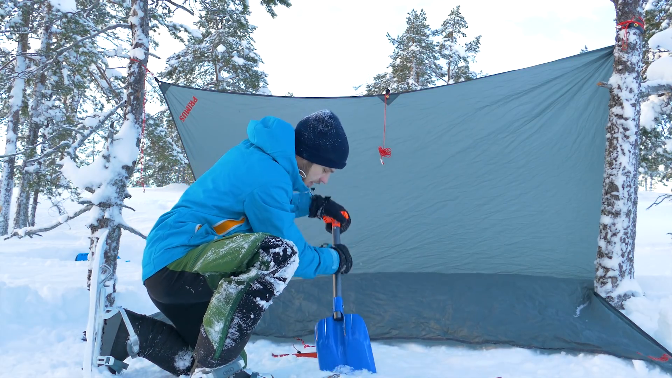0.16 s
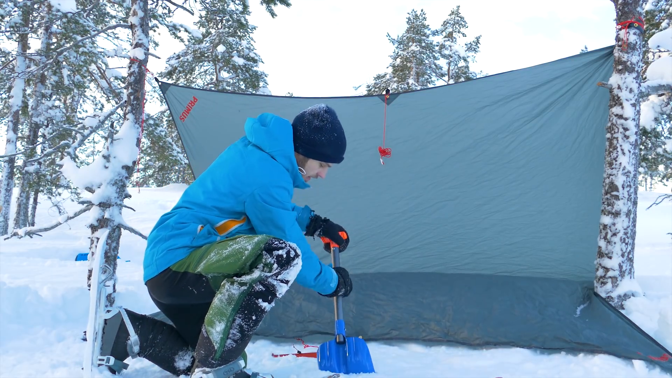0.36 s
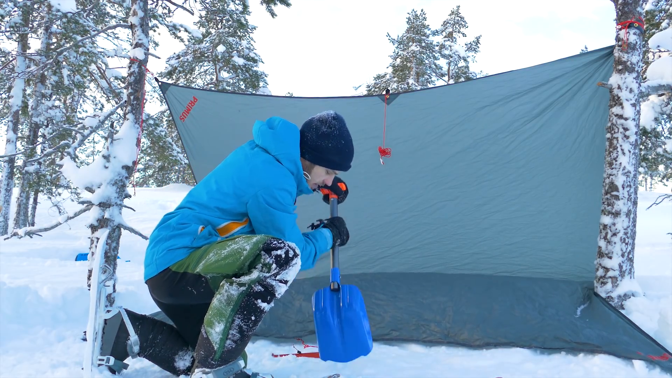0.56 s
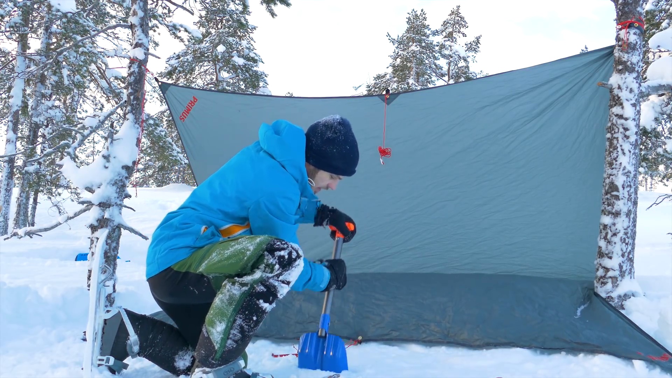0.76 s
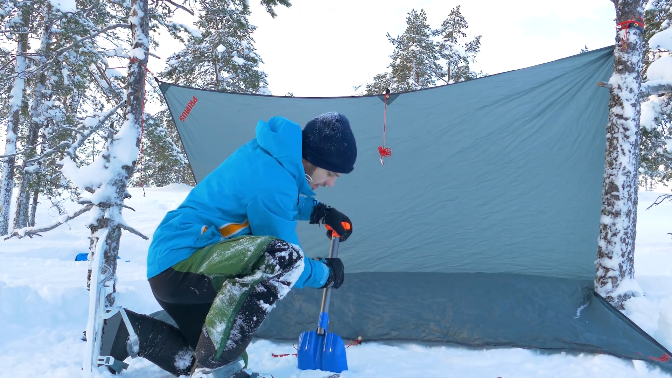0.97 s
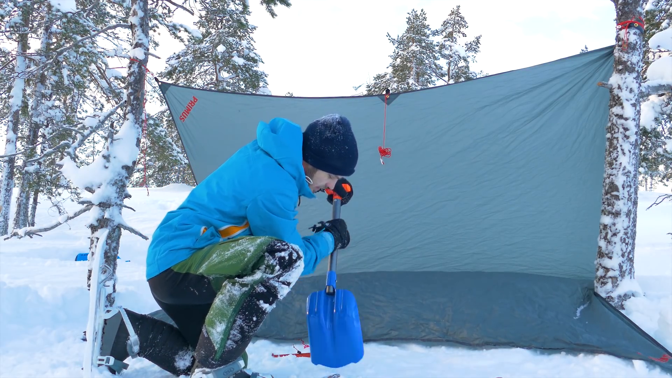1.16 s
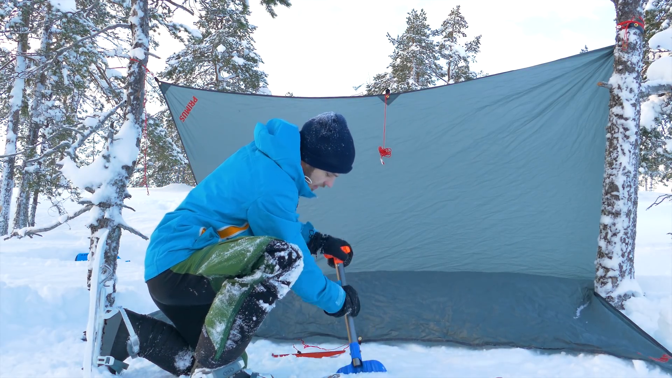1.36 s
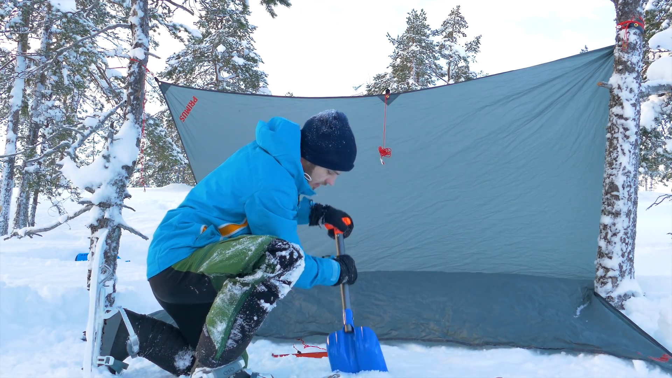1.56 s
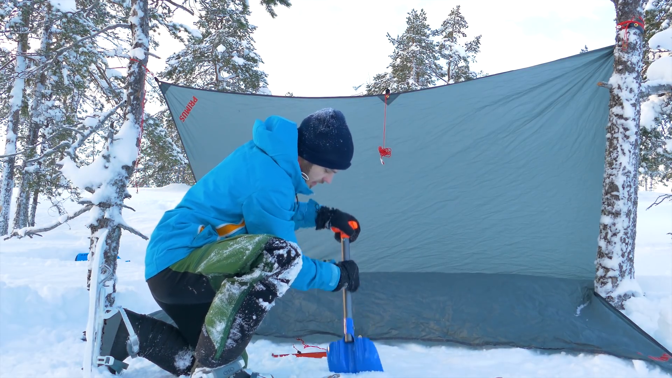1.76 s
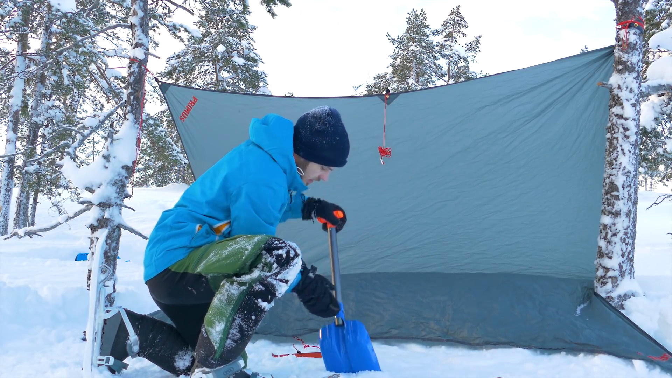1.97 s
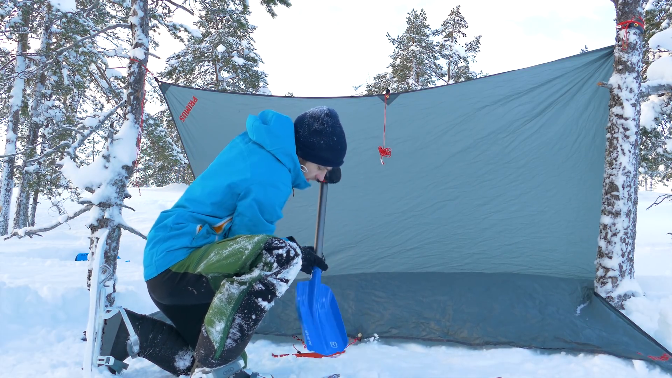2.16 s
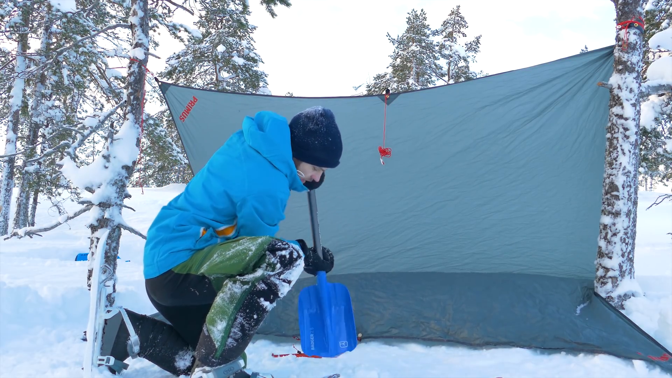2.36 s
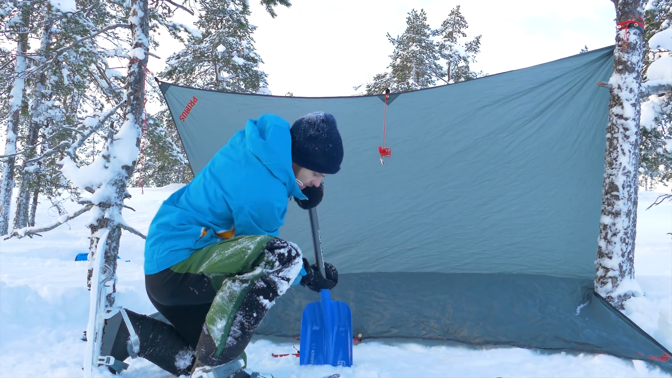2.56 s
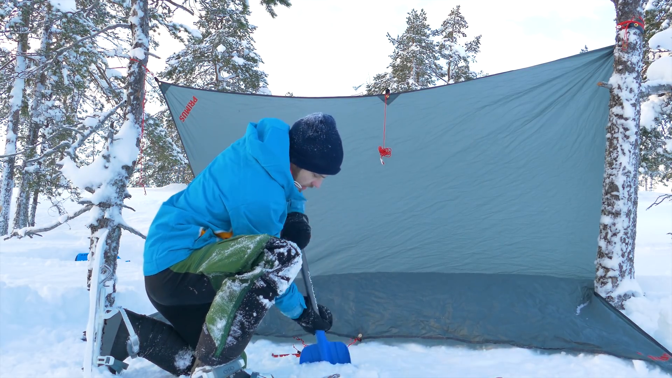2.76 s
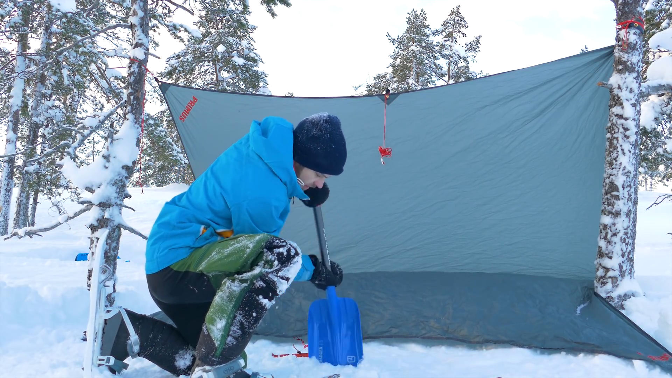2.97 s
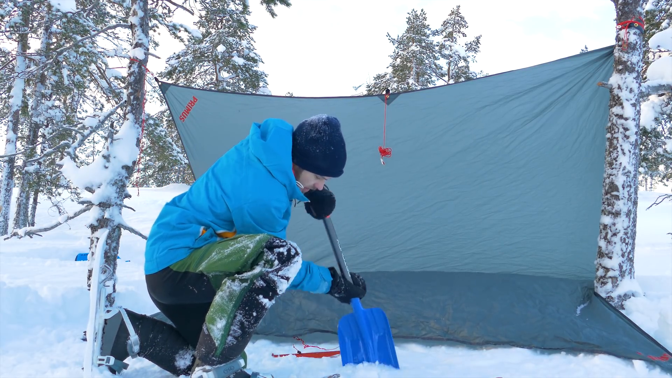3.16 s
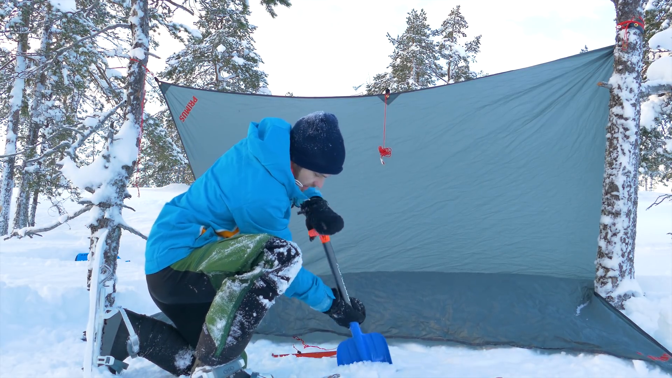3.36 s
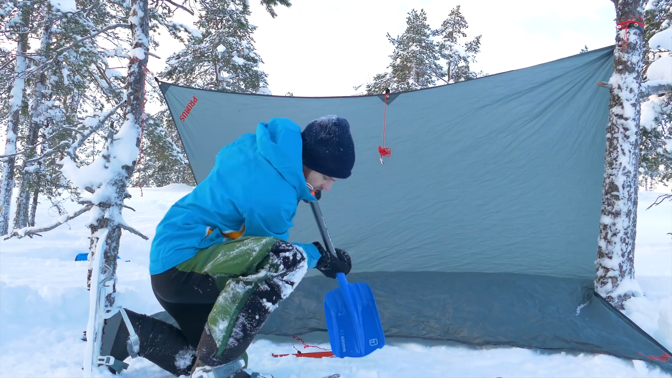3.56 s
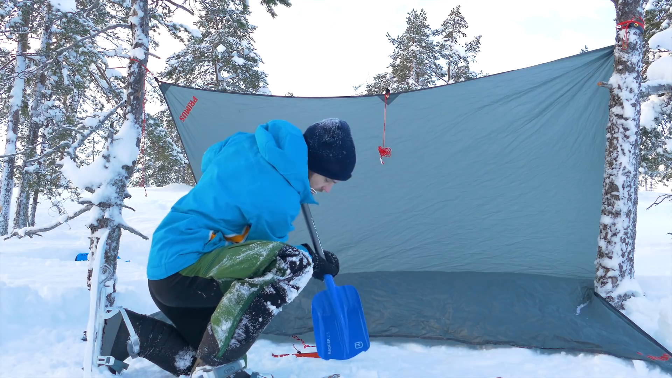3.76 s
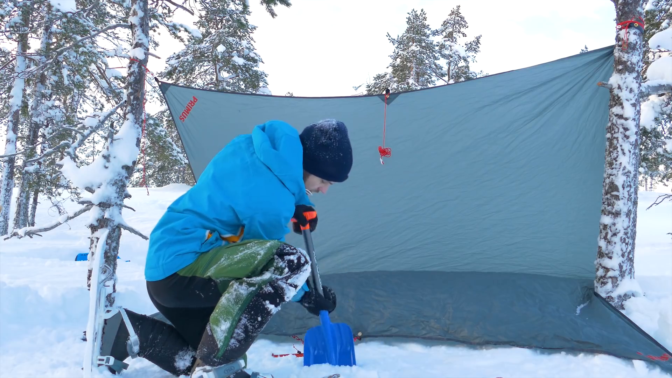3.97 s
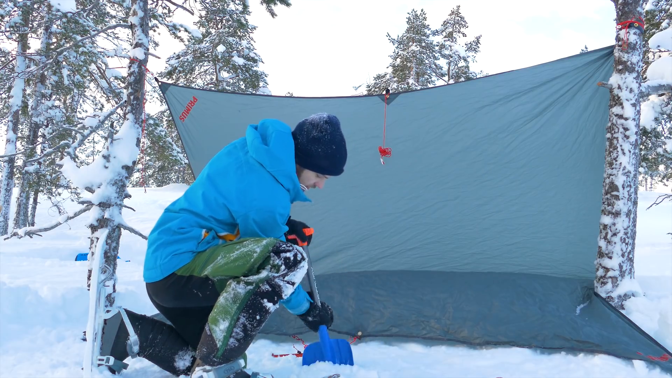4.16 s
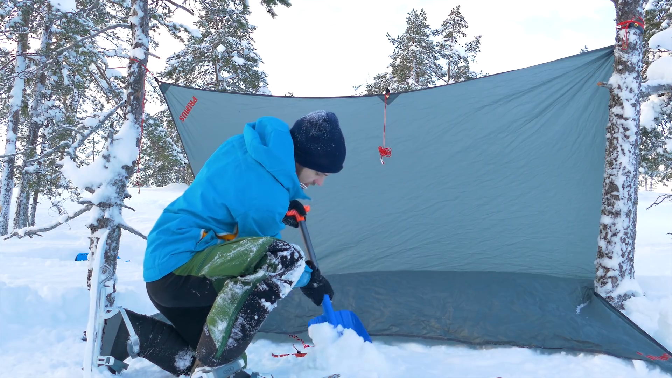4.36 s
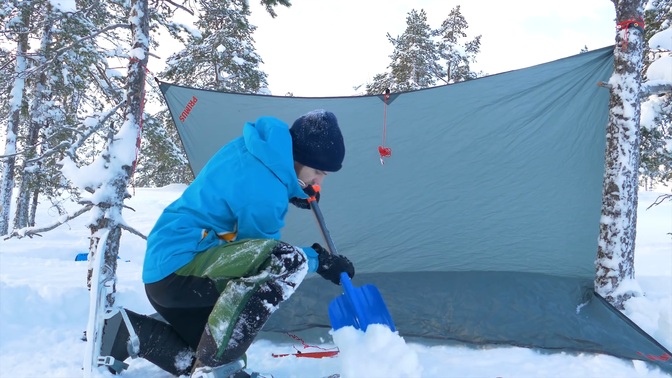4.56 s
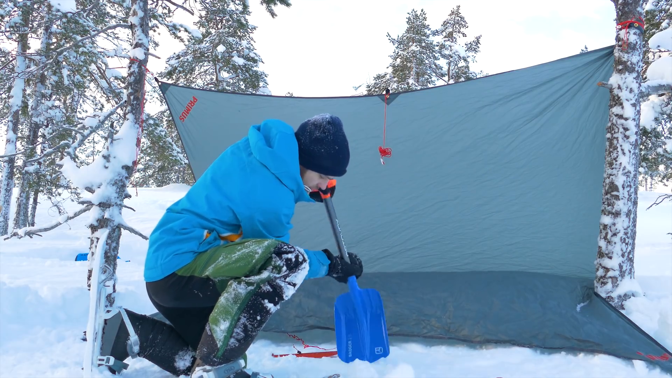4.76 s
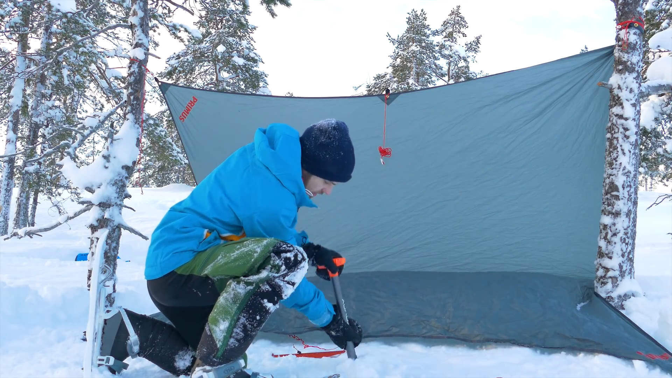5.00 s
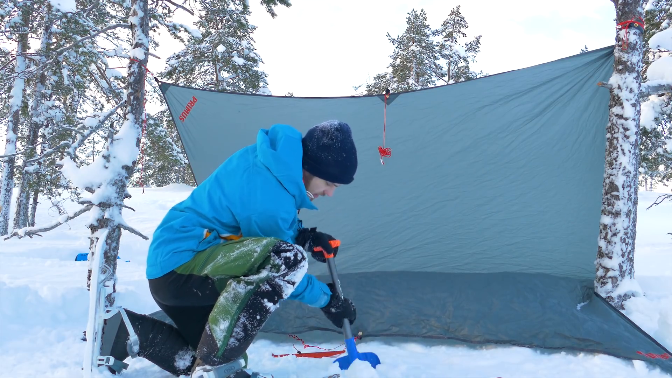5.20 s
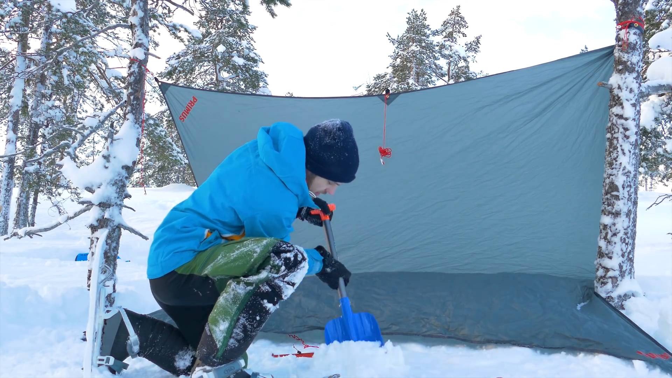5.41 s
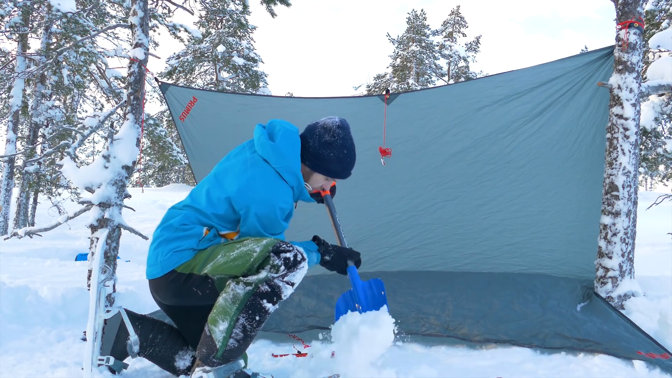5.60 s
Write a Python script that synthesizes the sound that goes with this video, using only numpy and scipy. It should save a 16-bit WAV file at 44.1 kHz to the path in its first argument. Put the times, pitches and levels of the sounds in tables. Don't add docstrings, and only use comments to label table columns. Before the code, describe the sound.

Close, crisp snow crunches, short scrapes and dull blade knocks from a hand shovel, with a distant low hum and soft outdoor hiss.

```python
import sys
import numpy as np
from scipy import signal
from scipy.fft import rfft, irfft, next_fast_len
from scipy.io import wavfile
from scipy.ndimage import uniform_filter1d

SR = 44100
rng = np.random.default_rng(int(sys.argv[2]) if len(sys.argv) > 2 else 0)


def natural_amplitude(level_db):
    exponent = np.asarray(level_db, float) / 20
    return 10 ** exponent


def pcm_store(signal):
    levels = np.round(np.clip(np.atleast_2d(signal), -1, 1) * 32767)
    wavfile.write(sys.argv[1], SR, levels.astype(np.int16).T)


N = 248724


def evened(x):
    return x / np.sqrt(np.mean(x ** 2) + 1e-20)


def read(points, hz):
    f, value = np.transpose(points)
    return np.interp(np.log(hz + 1), np.log(f + 1), value)


def add(mix, s, sound):
    part = mix[round(s * SR):][:len(sound)]
    part += sound[:len(part)]


def coloured(x, gain):
    size = next_fast_len(len(x))
    return irfft(rfft(x, size) * gain(np.fft.rfftfreq(size, 1 / SR)), size)[:len(x)]


def resonate(x, hz, width):
    r = np.exp(-np.pi * width / SR)
    return 2 * signal.lfilter([1 - r], [1, -r * np.exp(2j * np.pi * hz / SR)], x + 1e-18).real


def flicker(ms):
    size = max(int(ms * SR / 1000), 2)
    return evened(uniform_filter1d(uniform_filter1d(rng.standard_normal(N), size), size))


def drone(waver=0.0309, fuzz_db=-4, octave_db=-20, throb_db=4.0):
    # (time [s], pitch [Hz], level [dB])
    engine = [(0.0, 90.3, -51), (0.47, 105.8, -45.5), (0.69, 108.1, -42), (1.0, 96.84, -45),
              (1.26, 99.34, -44.5), (1.71, 88.85, -42.5), (1.92, 79.44, -55), (2.14, 92.56, -43),
              (2.48, 85.4, -47), (2.8, 90.3, -42), (3.82, 88.26, -48.5), (3.88, 85.17, -47.5),
              (3.99, 97.3, -45.5), (4.229, 100, -44), (4.399, 113.5, -44.5), (4.55, 114.4, -41),
              (5.499, 118.8, -44.5), (5.64, 112.4, -42.5)]
    s, hz, db = np.transpose(engine)
    t = np.arange(N) / SR
    pitch = np.interp(t, s, hz) * (1 + waver * flicker(ms=33.0))
    turns = 2 * np.pi * np.cumsum(pitch) / SR
    note = np.sqrt(2) * np.cos(turns) * natural_amplitude(throb_db * flicker(ms=15.2))
    fuzz = flicker(ms=7.6) * np.cos(turns) + flicker(ms=17.4) * np.sin(turns)
    octave = flicker(ms=5.7) * np.cos(2 * turns) + flicker(ms=13) * np.sin(2 * turns)
    return natural_amplitude(np.interp(t, s, db)) * (note + natural_amplitude(fuzz_db) * fuzz + natural_amplitude(octave_db) * octave)


def air(level_db=-45.5, swell_db=.5):
    # (pitch [Hz], level [dB per Hz])
    rumble = [(12, -11), (20, -2), (98, 6.5), (113, -2.5), (146, -3.5), (337, -24.5), (897, -36.5),
              (1330, -67), (3160, -59), (4300, -50), (5530, -55), (14300, -70), (16000, -57)]
    noise = coloured(rng.standard_normal(N), lambda hz: natural_amplitude(read(rumble, hz)))
    return natural_amplitude(level_db + swell_db * flicker(ms=420)) * evened(noise)


def motion():
    # (start [s], push [s], hold [s], fade [s], crush [dB])
    stabs = [(0.189, 0.021, 0.046, 0.13, -42), (0.761, 0.00082, 0.019, 0.15, -42.5),
             (0.907, 0.022, 0.091, .03, -72.5), (0.993, 0.021, 0.13, 0.03, -58),
             (1.298, 0.0035, .008, 0.016, -58), (1.302, 0.04, 0.012, 0.081, -38.5),
             (1.376, .02, 0.034, 0.046, -55.5), (1.747, 0.024, 0.13, 0.11, -55),
             (2.586, 0.056, 0.011, .035, -39), (2.852, 0.043, 0.12, 0.037, -54),
             (3.11, 0.047, .03, 0.023, -65), (3.152, 0.063, 0.016, 0.1, -43),
             (3.873, 0.066, 0.042, 0.077, -40.5), (4.838, 0.004, 0.025, 0.032, -51),
             (4.839, 0.057, 0.0083, 0.033, -36)]
    # (start [s], push [s], hold [s], fade [s], crush [dB])
    drags = [(0.0, 0.0015, 0.15, 0.041, -63.5), (.12, 0.041, .012, 0.018, -60),
             (0.38, 0.052, 0.11, 0.062, -59), (1.03, 0.071, 0.0022, 0.012, -46),
             (1.524, 0.11, .005, 0.16, -52), (1.768, 0.052, 0.0036, 0.097, -43),
             (1.898, 0.15, 0.044, 0.039, -53), (2.106, .02, 0.12, 0.036, -67.5),
             (2.259, 0.036, 0.079, 0.17, -59.5), (2.648, 0.037, 0.0092, 0.03, -34.5),
             (2.678, 0.037, 0.063, 0.071, -45.5), (2.922, 0.068, 0.0044, 0.11, -47.5),
             (3.228, 0.053, 0.0099, 0.09, -40.5), (3.344, 0.073, .2, 0.029, -56.5),
             (3.957, 0.042, 0.007, 0.05, -36), (4.017, 0.029, 0.05, 0.077, -49.5),
             (4.148, 0.12, 0.1, 0.055, -57), (4.305, 0.06, 0.018, 0.11, -47.5),
             (4.45, 0.06, 0.077, 0.07, -69), (4.616, 0.11, .01, 0.16, -64),
             (4.887, 0.054, 0.034, 0.091, -41), (4.966, 0.045, 0.052, 0.066, -48),
             (5.121, 0.14, 0.11, .08, -61.5), (5.36, 0.089, 0.069, 0.076, -56),
             (5.551, 0.072, 0.024, 0.13, -56)]
    # (at start [dB], at end [dB])
    powder_fizz = [
        (-0.88, -3.5),
        (-1.8, -1.5),
    ]
    # (time [s], flat-on body [dB], powder [dB], freedom to ring [dB])
    lie = [(.1, 0.5, -13.5, 0.5), (.25, 5.5, 0, 0.5), (.5, 2.5, 0, -1.5), (.78, 4.5, 2, -0.5),
           (1.1, 0, 0.5, 0), (1.35, 4, 2, -2), (1.63, 0, -0.5, -.6), (1.83, 1.5, 0.5, 1.5),
           (2.07, 5, 0.5, 1), (2.349, 2.5, -4.5, 0.5), (2.67, 1, -1, 0), (3.0, -1, -0.5, -2),
           (3.26, -0.5, -1.5, 0.5), (3.55, 1, -3, 0.5), (3.97, 0, -3, -0.5), (4.35, -3, 1.5, -1.5),
           (4.9, -0.5, -0.5, 0.5), (5.3, 0.5, 0, 1)]
    bite_db, swell_db, spent_db = -18, -22, -38.5
    rest_db, still_fizz_db = -75, -77.5
    thin_per_db, even_db = 0.4, -61

    t = np.arange(N) / SR
    crush, fizz = np.full(N, natural_amplitude(2 * rest_db)), np.full(N, natural_amplitude(2 * still_fizz_db))
    for first_db, rows, (start_db, end_db) in zip((bite_db, swell_db), (stabs, drags), powder_fizz):
        for s, push, hold, fade, db in rows:
            at = np.cumsum([0, push, hold, fade])
            u = np.arange(0, at[-1], 1 / SR)
            corners_db = db + np.array([first_db, 0, 0, spent_db])
            power = np.interp(u, at, np.sqrt(natural_amplitude(corners_db))) ** 4
            add(crush, s, power)
            add(fizz, s, power * natural_amplitude(2 * (start_db + (end_db - start_db) * u / at[-1])))
    s, flat_db, powder_db, loose_db = np.transpose(lie)
    crush_db = 10 * np.log10(crush)
    body_db = np.interp(t, s, flat_db) - thin_per_db * (crush_db - even_db)
    fizz_db = 10 * np.log10(fizz) - crush_db + np.interp(t, s, powder_db)
    return crush_db, body_db, fizz_db, np.interp(t, s, loose_db)


def crystals(per_s=6000, spread_db=1.5, turns=2.4, count=16):
    size = natural_amplitude(spread_db * np.minimum(rng.exponential(1, N), 5)) * rng.choice([-1., 1.], N)
    size *= rng.random(N) < per_s / SR
    kind, out = rng.integers(0, count, N), np.zeros(N)
    for k, hz in enumerate(np.linspace(500, 15500, count)):
        t = np.arange(int(SR * (turns + hz / 1500) / hz)) / SR
        blip = np.sin(2 * np.pi * hz * t) * np.sin(np.pi * t / t[-1]) ** 2
        out += signal.oaconvolve(size * (kind == k), blip / np.linalg.norm(blip))[:N]
    return evened(out)


def patchy(x, depth_db, bins=4, frames=7):
    z = signal.stft(x, nperseg=256, noverlap=192)[2]
    field = rng.standard_normal(z.shape[::-1]).T
    field = evened(uniform_filter1d(uniform_filter1d(field, bins, 0), frames, 1))
    return signal.istft(z * natural_amplitude(depth_db * field), nperseg=256, noverlap=192)[1][:N]


def blade(x, grip_db=1.0):
    # (pitch [Hz], width [Hz], level [dB])
    modes = [(603, 60, -14), (1335, 67, 3), (1480, 26, -5), (1780, 140, 4), (2100, 39, -6.5),
             (2530, 13, -5), (2960, 26.6, -7.5), (3720, 69, 6), (3983, 26, -2), (4300, 83, 3),
             (4890, 28, -1.5), (5520, 66, -9), (6220, 46, -7), (8080, 220, 1.5)]
    out = np.zeros(N)
    for k, (hz, width, db) in enumerate(modes):
        grip = natural_amplitude(db + grip_db * flicker(ms=94))
        out += (-1) ** k * grip * resonate(x, hz, width)
    return out


def crunch(grain_share=0.24, ring_db=3, ring_slope=0.16, judder_db=1.36, patch_db=2.5, thump_db=-4,
           rim_db=6, rim_hz=4450):
    # (pitch [Hz], level [dB per Hz])
    snow_colour = [(150, 7), (250, 4), (875, -7.5), (1500, -10), (2400, -9), (3000, -6), (4900, -6.5),
                   (5400, -7.5), (8300, 1), (14200, 0.5), (16000, -7.5)]
    band_hz = [
        450,
        1450,
        3900,
        9500,
    ]
    crush_db, body_db, fizz_db, loose_db = motion()
    drive = np.sqrt(grain_share) * crystals() + np.sqrt(1 - grain_share) * rng.standard_normal(N)
    drive = patchy(drive, patch_db) * natural_amplitude(judder_db * flicker(ms=9))
    ring = natural_amplitude(ring_db + loose_db - ring_slope * body_db)
    drive = drive + natural_amplitude(rim_db) / (1 + ring) * resonate(drive, rim_hz, 230)
    snow = (drive + ring * blade(drive)) / np.sqrt(1 + 0.023 * ring ** 2)
    snow = coloured(snow, lambda hz: natural_amplitude(read(snow_colour, hz)))
    out = np.zeros(N)
    for k, rel_db in enumerate([body_db + thump_db, body_db, 0, fizz_db]):
        shape = list(zip(band_hz, np.eye(4)[k]))
        band = coloured(snow, lambda hz: read(shape, hz) * (hz > 150))
        out += evened(band) * natural_amplitude(crush_db + rel_db)
    return out


def blows():
    # (time [s], body [dB], body pitch [Hz], edge rel. body [dB], edge pitch [Hz])
    crumbs = [(.096, -69, 1500, 5, 4560), (.116, -66, 510, 15, 5200), (.385, -56, 1824, 8, 2850),
              (.618, -72, 690, 13, 4300), (1.01, -57, 510, -7, 4400), (1.295, -74, 1500, 14, 5400),
              (1.475, -70, 497, 12, 3600), (1.496, -65, 1200, -3, 4060), (1.597, -42, 1120, -12, 4300),
              (2.056, -40, 1308, -7, 3000), (2.521, -36.5, 1444, -1.5, 3100), (2.575, -47, 1500, -2, 4300),
              (3.071, -54, 1500, -6, 4300), (3.362, -59, 1180, 16, 4300), (3.373, -58.5, 2270, 16.5, 4300),
              (3.707, -50.5, 1204, -2.5, 4300), (4.666, -66, 1500, 10.5, 4300),
              (4.824, -62, 2200, 1.5, 2800), (5.235, -56, 1900, -6, 2800), (5.278, -47, 1500, -1, 5400)]
    cracks = [(.175, -30.5, 2180, -1, 2690), (.717, -47, 1530, -3, 2900), (.727, -35.5, 1400, 0.5, 4300),
              (.735, -46, 600, -10, 4330), (0.762, -38, 1560, -2, 3050), (.769, -33, 1530, 5, 3050),
              (.8, -35, 2024, 1, 2620), (1.225, -40.5, 1110, -15, 2670), (1.718, -47, 1310, 2, 3720),
              (1.95, -36.5, 1070, -11, 2484), (2.136, -34, 2050, -3.5, 3010), (2.22, -36, 1130, -16, 2960),
              (3.674, -48.5, 606, 1, 4290), (3.944, -39.5, 2000, 14, 4770), (4.341, -47, 613, 15, 4000),
              (4.559, -51, 1350, 0, 4300), (4.745, -47, 1680, -22, 3500)]
    snaps = [(0.182, -29, 1690, -16, 4360), (0.221, -32.5, 1920, 3, 2410), (0.407, -41, 1486, -10, 2500),
             (0.49, -44, 1490, 3, 2530), (0.781, -21, 1800, -10, 2510), (1.504, -43.5, 1270, 0, 2640),
             (1.508, -43.5, 1130, 4, 3900), (1.976, -34, 1140, -12, 3520), (2.111, -55, 2085, -6, 3390),
             (2.281, -38.5, 1960, -10, 3550), (2.319, -50, 2160, -16, 2660),
             (2.855, -48.5, 1060, 10.5, 4160), (3.086, -40, 1490, -11, 3400), (3.732, -59, 2040, -24, 2587),
             (5.133, -48.5, 930, 12.5, 4200), (5.164, -46.5, 902, -5.5, 3950),
             (5.258, -33.5, 1290, -5.5, 4590)]
    bursts = [(0.205, -37, 1940, 8, 4330), (0.247, -40, 1500, -2.5, 4320), (.272, -36, 1850, -3, 2700),
              (1.087, -42, 1400, -1, 4000), (1.326, -35, 1600, 10, 3000), (1.339, -37.5, 1683, 7, 3030),
              (1.408, -43, 1200, -12, 3280), (2.62, -45, 1500, 10, 3000), (2.632, -35.5, 1850, 10, 4200),
              (2.679, -39, 1770, 9, 4410), (2.769, -42.5, 1808, 1.5, 4510), (2.93, -47, 1200, -36, 3670),
              (2.994, -46, 1302, 9, 3017), (3.19, -46, 1450, 10, 3640), (3.26, -39, 1544, -8, 3680),
              (3.875, -62, 1460, 20, 2940), (3.911, -46.5, 1766, 15, 3640), (3.979, -48, 1470, 3, 4930),
              (4.009, -49, 2000, 2.5, 4320), (4.839, -50, 1940, 15, 3670), (4.859, -47, 2160, 15, 3730),
              (4.88, -38, 1530, 9, 4780), (4.893, -32, 1510, 0, 4743), (4.906, -43, 1360, 14, 4770)]
    dull_knocks = [(.586, -49, 1510, -6, 3040), (1.241, -46.5, 1484, 5.5, 2690),
                   (1.361, -28, 1530, -9, 3020), (2.142, -46, 2000, 0, 3000), (2.23, -35, 694, -9, 3020),
                   (2.394, -27.5, 1340, -5.5, 3230), (2.403, -38.5, 1500, -24, 3000),
                   (3.219, -33, 1900, 2, 4670), (3.608, -44, 1300, 11, 4300), (3.747, -36, 2060, -9, 4270),
                   (3.778, -47, 1290, 2, 4300), (4.773, -41.5, 1610, -16, 3717)]
    rattles = [(.648, -41, 1540, 2.5, 4400), (2.124, -32, 2090, -2.5, 3400), (2.212, -48, 1800, -6, 3500),
               (2.381, -45, 1990, 2, 3120), (2.596, -55, 1500, 13, 4450)]
    ticks = [(1.53, -33, 1280, -19, 2460), (1.825, -21.5, 1920, -11, 2480), (1.916, -46, 2000, 9.5, 4500),
             (2.3, -36, 1190, -13, 3750), (2.39, -33, 1930, -12, 4700), (3.463, -33, 1600, -14, 4653),
             (4.173, -54, 1400, 7, 3770), (4.499, -26.5, 1330, -16.5, 4300), (4.509, -50, 1590, -6, 4130),
             (4.963, -25.5, 1727, -9, 4450), (4.973, -30.5, 1500, -15, 2560)]
    # (crumble t60 [s], treble rel. edge [dB], top of the treble [Hz],
    # blow over crumble [dB], sharpness of the body [pitch / width])
    kinds = [
        (0.024, -2.5, 10100, 21.5, 1.55),
        (0.025, -15.5, 11700, 22, 1.32),
        (0.064, -2, 9700, 18.5, 1.23),
        (0.054, -8.5, 7670, 18, 0.92),
        (0.1, -8.5, 7900, 2, 1),
        (0.089, -20, 17000, 25, 2.3),
        (0.021, -2, 14400, 25.5, 1.5),
    ]
    groups = [ticks, snaps, cracks, dull_knocks, rattles, bursts, crumbs]
    return [row + kind for rows, kind in zip(groups, kinds) for row in rows]


def clang(strike, low_hz, high_hz, pick_db=7):
    # (pitch [Hz], t60 [s], level [dB])
    free_modes = [(615, 0.11, -3), (1345, 0.09, 5), (1500, 0.17, 3), (1965, 0.17, -2.5), (2110, 0.07, -1.5),
                  (2266, .15, -8), (2560, 0.1, -14), (2960, .07, 2.5), (3400, .055, -5), (3520, 0.09, -14),
                  (3973, .17, -9), (4340, 0.06, -5)]
    out = np.zeros(len(strike))
    for hz, t60, db in free_modes:
        octaves_off = min(abs(np.log2(hz / low_hz)), abs(np.log2(hz / high_hz)))
        out += natural_amplitude(db - pick_db * octaves_off) * resonate(strike, hz, 2.3 / t60) * t60 / 0.06
    return out


def knocks(wide_db=-12, trim_db=-3, tick_db=2, tick_s=0.00059, ring_db=3, dry_s=0.08, buried_db=-50,
           rim_db=14, rim_width_hz=500):
    t, out = np.arange(5500) / SR, np.zeros(N)
    crush_db = motion()[0]
    low = signal.butter(3, [400, 2400], "band", fs=SR, output="sos")
    edge = signal.butter(3, [2400, 5500], "band", fs=SR, output="sos")
    for s, db, hz, edge_db, rim_hz, t60, crisp_db, top_hz, blow_db, sharp in blows():
        treble = signal.butter(2, [5500, top_hz], "band", fs=SR, output="sos")
        decay = natural_amplitude(-60 * t / t60) + natural_amplitude(tick_db) * np.exp(-t / tick_s)
        crumble = rng.standard_normal(len(t)) * decay
        blow = crumble + natural_amplitude(blow_db) * (t == 0)
        hollow = resonate(resonate(blow, hz, hz / sharp), hz, hz / sharp)
        rim = blow + natural_amplitude(rim_db) * resonate(blow, rim_hz, rim_width_hz)
        parts = [signal.sosfilt(low, evened(hollow) + natural_amplitude(wide_db) * evened(blow)),
                 signal.sosfilt(edge, rim),
                 signal.sosfilt(treble, crumble)]
        gains = natural_amplitude(np.array([0, edge_db, edge_db + crisp_db]) + db + trim_db)
        body, middle, top = (g * p / np.sqrt(uniform_filter1d(p ** 2, size=66).max())
                             for g, p in zip(gains, parts))
        free = min(t60 / dry_s, 1) ** 2 * min(natural_amplitude(buried_db - crush_db[round(s * SR)]), 1)
        ringing = natural_amplitude(ring_db) * free * clang(body + middle, hz, rim_hz)
        add(out, s + 0.000964, body + middle + top + ringing)
    return out


def thuds(t60=0.048):
    # (time [s], peak [dB], pitch [Hz])
    dull_blows = [(0.183, -37.5, 514), (0.222, -26.5, 268), (0.244, -44, 300), (.27, -42, 425),
                  (0.406, -35, 190.7), (0.731, -33, 572), (0.783, -43, 370), (1.226, -52, 580),
                  (1.734, -37.5, 268), (2.222, -42, 609), (2.232, -37.5, 240.9), (2.39, -31, 641),
                  (2.402, -35.5, 259), (3.22, -35, 287), (4.249, -39, 233), (4.498, -39, 238),
                  (5.256, -44, 223)]
    t, out = np.arange(4000) / SR, np.zeros(N)
    for s, db, hz in dull_blows:
        swing = natural_amplitude(db - 60 * t / t60) * np.sin(2 * np.pi * hz * t)
        add(out, s, swing * np.minimum(t / 0.0013, 1))
    return out


def scene():
    # (pitch [Hz], level [dB])
    side_colour = [(60, -37), (180, -32), (300, -29), (550, -22.5), (1650, -20), (4970, -14.5), (9000, -13),
                   (15000, -10)]
    mid = crunch() + knocks() + thuds() + drone() + air()
    scatter = rng.standard_normal(400) * natural_amplitude(-np.arange(400) / 10)
    scattered = signal.oaconvolve(mid, scatter / np.linalg.norm(scatter))[:N]
    side = coloured(scattered, lambda hz: natural_amplitude(read(side_colour, hz) - 11.0))
    return np.array([mid + side, mid - side])


def band_limit(x):
    return signal.sosfilt(signal.butter(12, 16480, fs=SR, output="sos"), x)


def record(dry, edge_hz=16100):
    low_pass = signal.firwin(511, edge_hz, window=("kaiser", 9), fs=SR)
    limited = signal.oaconvolve(dry, low_pass[None], "same")
    return band_limit(limited)


dry = scene()
out = record(dry)
pcm_store(out)
```